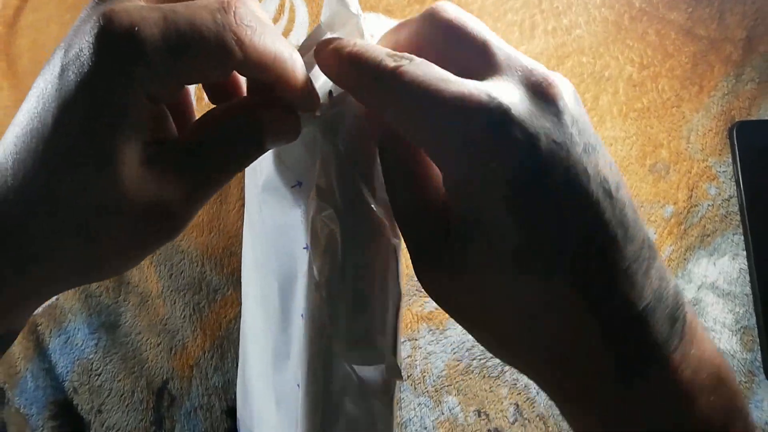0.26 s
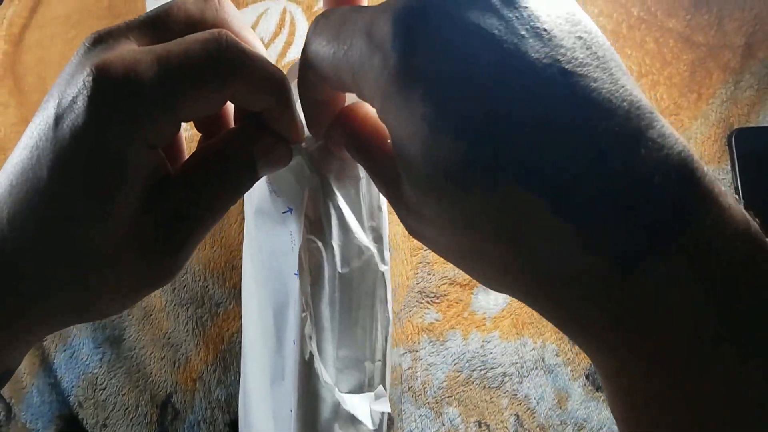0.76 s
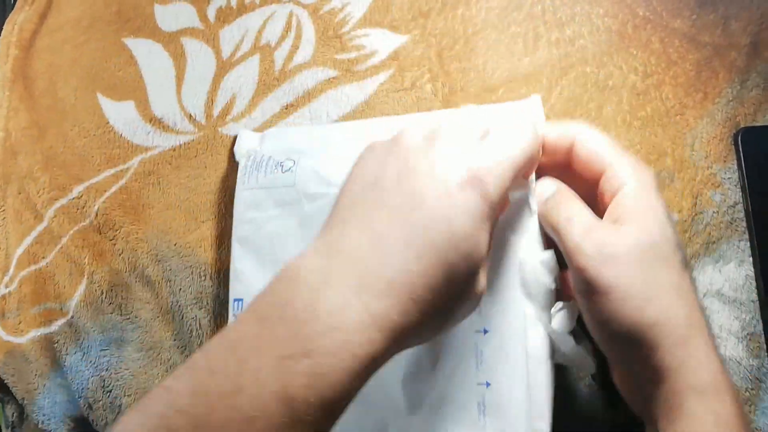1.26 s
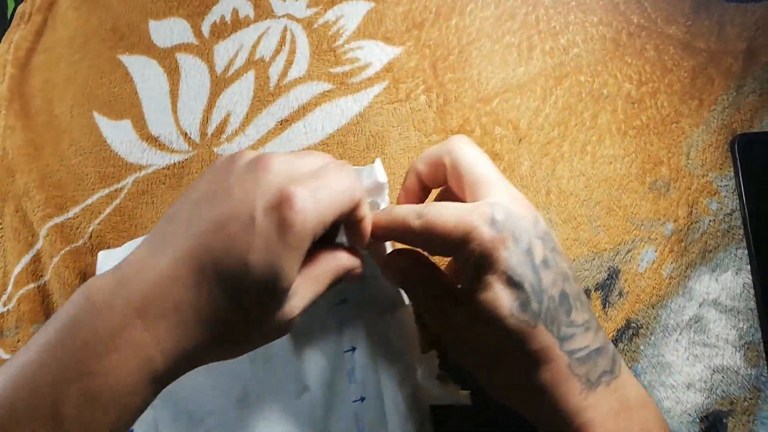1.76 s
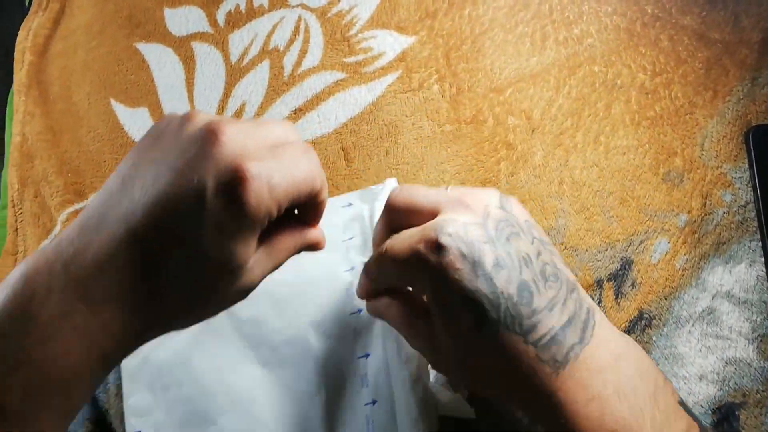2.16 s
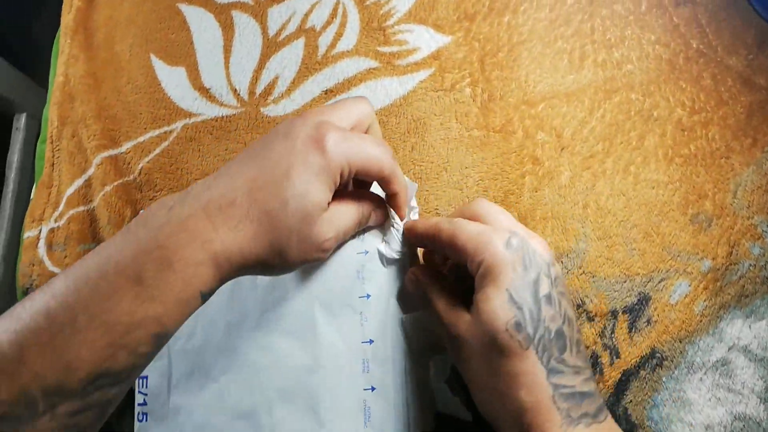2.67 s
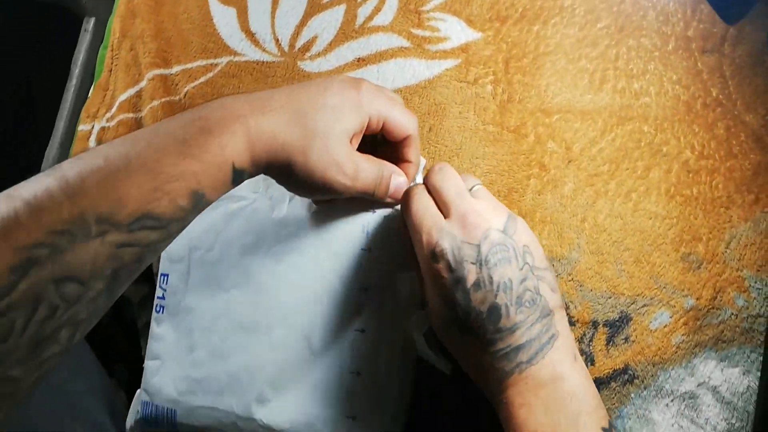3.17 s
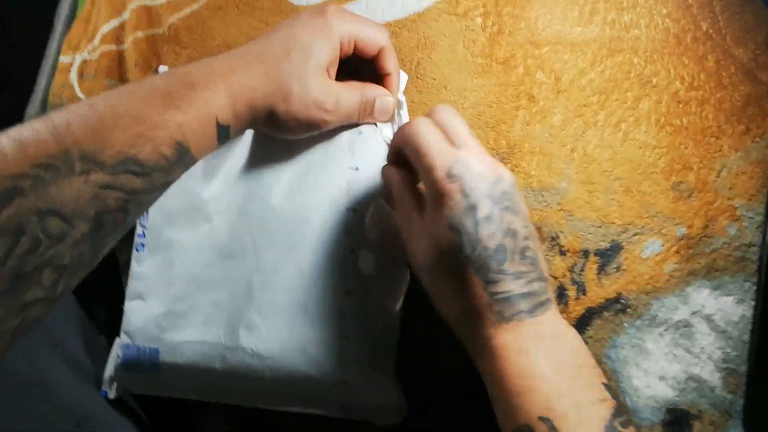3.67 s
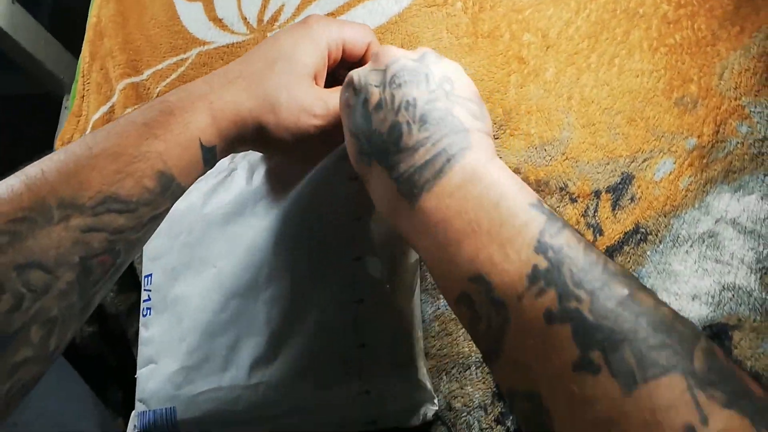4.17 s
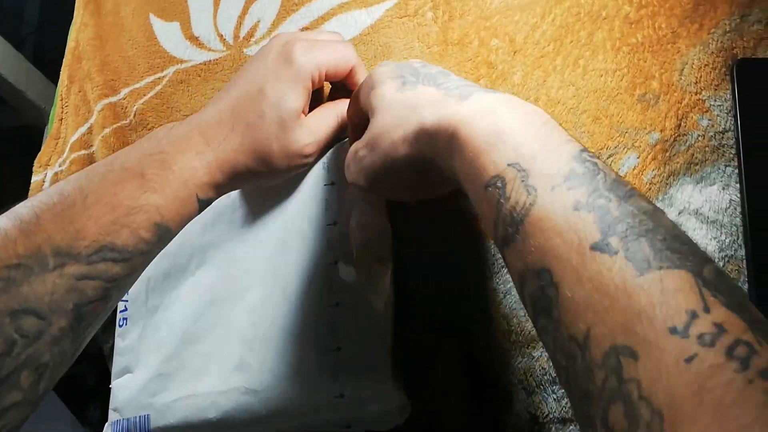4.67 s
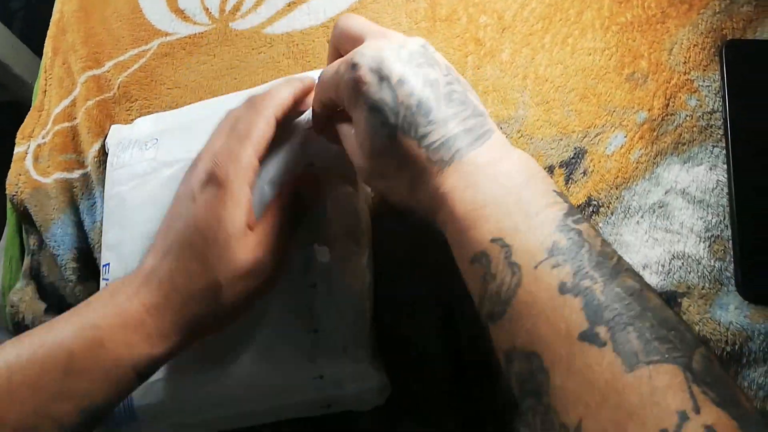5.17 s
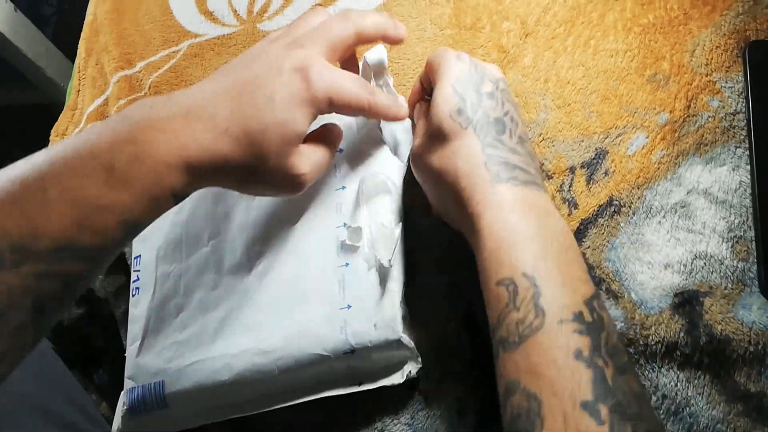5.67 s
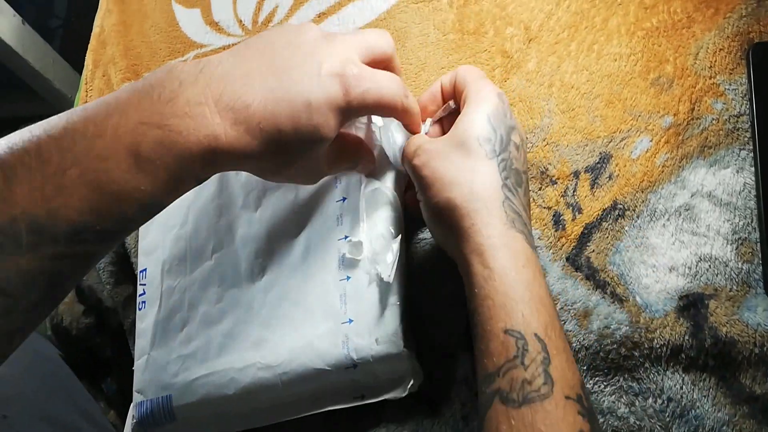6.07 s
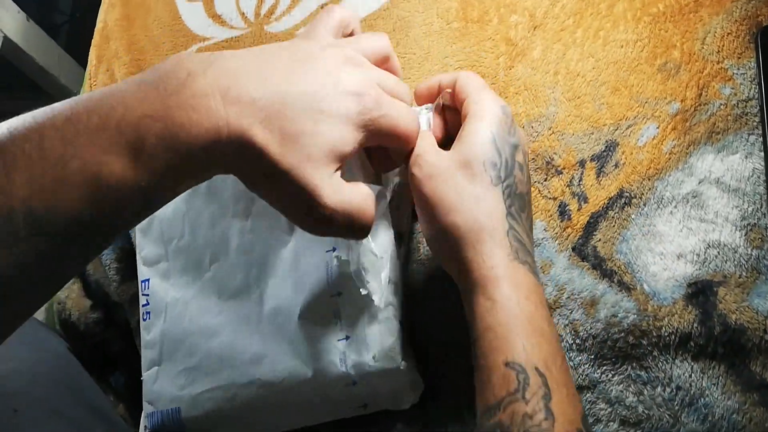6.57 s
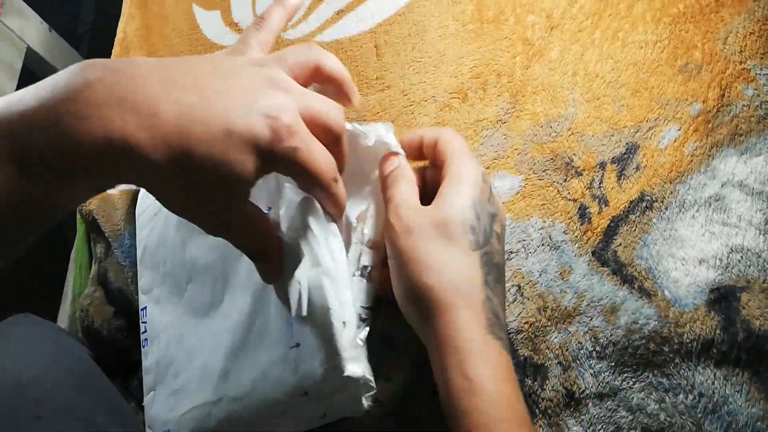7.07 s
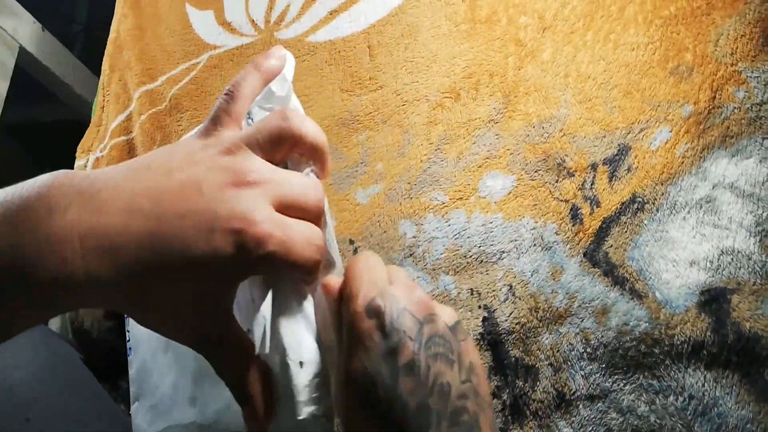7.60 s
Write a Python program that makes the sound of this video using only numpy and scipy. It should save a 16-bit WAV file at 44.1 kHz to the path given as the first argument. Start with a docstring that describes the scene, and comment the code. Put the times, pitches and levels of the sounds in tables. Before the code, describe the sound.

Close, uneven crackling and short crunches as a bubble-lined paper envelope is gripped, tugged and ripped in a quiet room.

```python
"""A quiet, humming room; a two-port microphone close to a blanket, where two hands crumple and tear
a bubble-lined paper envelope. Creases buckle as snaps: swarms of small ones under the grip, single
loud ones on top. Folds give way in short crunches and the seam rips. The air cushion pops near
1.4 kHz, the packet thumps the blanket, and the taut plastic film pings and squeaks."""
import sys
import numpy as np
from scipy import signal
from scipy.fft import rfft, irfft
from scipy.io import wavfile
from scipy.ndimage import uniform_filter1d

SR = 44100
rng = np.random.default_rng(int(sys.argv[2]) if len(sys.argv) > 2 else 0)


def master(y):
    """Save y as 16-bit WAV."""
    cut = np.clip(np.atleast_2d(y).T, -1, 1)
    pcm = np.round(cut * 32767)  # scale
    wavfile.write(sys.argv[1], SR, pcm.astype(np.int16))


N = 345744

# edges between seven bands (thump, knock, cushion, paper, creases, treble, air): f/Hz
BAND_EDGES_HZ = [400, 850, 2200, 4000, 6500, 11000]
# decay of a crease in each band: t60/s
BAND_T60 = [0.038, 0.011, 0.018, 0.011, 0.018, 0.0089, 0.005]
# loud creases: t/s, level/dB, cushion re level/dB, treble re level/dB
LOUD_SNAPS = [(0.375, -17.5, -33, -8), (0.389, -8.5, -28, -2.5), (0.684, -37.5, -25, 22),
              (0.698, -37.5, -31, 24.5), (0.844, -31.5, -6, 6.5), (0.909, -46.5, -31, 24),
              (0.971, -15.5, -12, 7), (1.073, -26.5, -19, 1), (1.217, -12, -9, -14), (1.409, -13, -3, -27),
              (1.619, -4, -19.5, -11), (1.708, -18.5, -30, 6), (1.887, -16.5, -8.5, -14),
              (2.141, -28.5, -15, 6), (2.271, -5, -21, -11), (2.7366, -28.5, -8.5, 12.5),
              (3.094, -23, -11, -3), (3.221, -18.5, 1.5, -22), (3.462, -19, -17, 1.5), (3.533, -14, -9, -3),
              (3.591, -12.5, -0.5, 0.5), (3.658, -9.5, -5.5, -21), (3.669, -27, -18, 13),
              (3.692, -16.5, -28, 2), (3.786, -15, -12.5, -21), (4.007, -23.5, -2, -34),
              (4.103, -28, -16, 2), (4.141, -6.5, -12, -35), (4.211, -22, -2, -39),
              (4.344, -13.5, -12, -54), (4.368, -14, -8, -30), (4.4, -12.5, -6.5, -19),
              (4.54, -11, -13.5, 0.5), (4.633, -17, -29, 6.5), (4.662, -19.5, -2.5, -39),
              (4.769, -6, -12, -28), (4.854, -13.5, -3.5, -1.5), (4.913, -26, 6.5, 7.5),
              (5.117, -26, -13, 10.5), (5.21, -8.5, -22, -5.5), (5.247, -5.5, -10.5, -9),
              (5.257, -12, -11.5, -5), (5.326, -3, -16.5, -52), (5.34, -15, -10, 0.5),
              (5.501, -17, -8.5, -9), (5.836, -25, -32, 1), (6.054, -13, -11, -2), (6.471, -7.5, -10, -11),
              (6.698, -2, -20, -9), (6.726, -10, -30, -5), (6.818, -7.5, -41, -2.5),
              (6.868, -7.5, -5.5, -15), (6.912, -10.5, -36, -3.5), (7.115, -18, -12, 0.5),
              (7.162, -11.5, -14, -11), (7.285, -9.5, -19, -9), (7.378, -8, -29, -33),
              (7.388, -8.5, -46, -4), (7.4, -25.5, -27, 13), (7.601, -13, -10.5, -30), (7.72, -17, 4, 14),
              (7.739, -22, -21, 0)]
# packet tugged against the blanket: t/s, level/dB
TUGS = [(2.203, -32), (2.25, -32.5), (2.319, -29), (2.381, -32.5), (3.587, -25), (5.543, -39), (6.345, -28),
        (7.749, -29.5)]


def amp(db):
    return 10 ** (np.asarray(db) / 20)


def unit_rms(x):
    return x / np.sqrt(np.mean(x ** 2) + 1e-20)


def curve_at(points, hz, column=1):
    """One column of a table, interpolated over log frequency."""
    table = np.transpose(points)
    return np.interp(np.log(hz + 1), np.log(table[0] + 1), table[column])


def decay(power, t60):
    """Every spike of power starts a decay of that height."""
    return signal.lfilter([1], [1, -amp(-120 / (t60 * SR))], power)


def smooth(x, samples):
    return uniform_filter1d(uniform_filter1d(x, samples), samples)


def held_db(start, length, rise_db_per_s, fall_db_per_s):
    """Attack, hold, release in dB re the held level, every millisecond."""
    t = np.arange(0, N / SR, 1e-3)
    return -rise_db_per_s * np.maximum(start - t, 0) - fall_db_per_s * np.maximum(t - start - length, 0)


def per_sample(curve):
    return np.interp(np.arange(N), np.linspace(0, N, len(curve)), curve)


def hollow_tones(times, levels_db, hz, octaves, t60, rise_s):
    """One dying tone for each blow, each at its own pitch around hz."""
    out, t = np.zeros(N), np.arange(4000) / SR
    pitches = hz * 2 ** (octaves * rng.uniform(-1.23, 1, len(times)))
    for start, db, pitch in zip(times, levels_db, pitches):
        tone = amp(db - 60 * t / t60) * np.minimum(t / rise_s, 1) * np.sin(2 * np.pi * pitch * t)
        span = out[round(start * SR):][:len(t)]
        span += tone[:len(span)]
    return out


def room_hum(level_db=-55):
    """Steady room tone and microphone noise on both paths."""
    spectrum = [(30, 1.5), (1460, -14), (16000, -21.5)]  # f/Hz, level/dB
    colour = amp(curve_at(spectrum, np.fft.rfftfreq(N, 1 / SR)))
    return amp(level_db) * unit_rms(irfft(rfft(rng.standard_normal((2, N))) * colour, N))


def blanket_rumble(t60=0.22, tail_db=-6.5):
    """Power of the low rumble after each tug."""
    times, db = np.transpose(TUGS)
    spikes = np.zeros(N)
    spikes[(times * SR).astype(int)] = amp(db + tail_db) ** 2
    return abs(uniform_filter1d(decay(spikes, t60), size=600))


def blanket_thumps():
    """The blanket answers each tug with a dull push."""
    return hollow_tones(*np.transpose(TUGS), hz=172.7, octaves=0.57, t60=0.061, rise_s=0.0027)


def plastic_film(roughness=0.31, rise_s=0.0022):
    """Taut film lets go with a ping or squeaks under a finger, ringing roughly in its modes."""
    # film lets go: t/s, level/dB
    pings = [(3.405, -13.5), (3.5055, -7)]
    # film slips: t/s, level/dB
    squeaks = [(3.405, -34), (3.4208, -40), (3.4364, -33), (3.4715, -31), (3.5659, -37)]
    # two ping modes, then three squeak modes: f/Hz, level/dB, t60/s
    film_modes = [(7260, -1.5, 0.036), (7730, -6, 0.028), (3200, 8, 0.043), (4300, 3, 0.044),
                  (5200, -1, 0.057)]
    out, t = np.zeros(N), np.arange(6000) / SR
    for blows, modes in ((pings, film_modes[:2]), (squeaks, film_modes[2:])):
        for start, blow_db in blows:
            ring = sum(amp(blow_db + db - 60 * t / t60) * np.sin(2 * np.pi * hz * t)
                       for hz, db, t60 in modes)
            stutter = 1 + roughness * unit_rms(uniform_filter1d(rng.standard_normal(len(t)), size=60))
            out[round(start * SR):][:len(t)] += ring * stutter * np.minimum(t / rise_s, 1)
    return out


def cushion_pops():
    """The air cushion answers each loud snap with a hollow pop."""
    times, snap_db, cushion_db, _ = np.transpose(LOUD_SNAPS)
    return hollow_tones(times, snap_db + cushion_db + 1.5, hz=1399, octaves=0.41, t60=0.021, rise_s=49e-5)


def facet_rings(power, struck, level_db=-4.0, t60_ratio=0.39, pitch_count=5):
    """Each crease strikes its own small facet: a dying tone in each of four bands, cushion to treble."""
    out, pick = np.zeros(N), rng.integers(0, pitch_count, (len(struck), len(BAND_T60)))
    for band in range(2, 6):
        radius = amp(-60 / (t60_ratio * BAND_T60[band] * SR))
        pitches = np.geomspace(1.15 * BAND_EDGES_HZ[band - 1], 0.823 * BAND_EDGES_HZ[band], pitch_count)
        for j, hz in enumerate(pitches):
            blows, hits = np.zeros(N), struck[pick[:, band] == j]
            blows[hits] = np.sqrt(2 * abs(power[band, hits]))
            poles = [1, -2 * radius * np.cos(2 * np.pi * hz / SR), radius ** 2]
            out += signal.lfilter([.5, 0, -.5], poles, blows)
    return amp(level_db) * np.array([out, np.roll(out, shift=31)])  # the other path is 24 cm longer


def packet_noise(power, band):
    """Noise on both paths that follows one band's power, in the packet's colour."""
    # the packet as the microphone colours it: f/Hz, level/dB
    spectrum = [(24, -74), (40, -11.5), (199, -1), (312, -5.5), (479, -15.5), (1070, -9.5), (1520, -6.5),
                (2210, -8.5), (3060, 0), (6490, -3), (8990, 0.5), (11600, -10), (16000, -29.5)]
    hz, edges = np.fft.rfftfreq(4096, 1 / SR) + 1, [1e-3] + BAND_EDGES_HZ + [1e9]
    skirts = np.sqrt((1 + (edges[band] / hz) ** 12) * (1 + (hz / edges[band + 1]) ** 12))
    gain = amp(curve_at(spectrum, hz)) / skirts
    log_gain = np.log(np.r_[gain, gain[-2:0:-1]] + 1e-5)
    taps = np.fft.ifft(np.exp(np.conj(signal.hilbert(log_gain)))).real[:2048]  # minimum phase
    taps /= np.linalg.norm(taps)
    jolts = rng.standard_normal((2, N)) * np.sqrt(abs(power))
    return signal.oaconvolve(jolts, taps[None], axes=1)[:, :N]


def handling(rest_db=-61, rest_cushion_db=-63):
    """Paper, cushion and treble lift in dB: rest, grips and crunches add; the top grip sets the lift."""
    # hands work the packet: t/s, length/s, rustle/dB, cushion re rustle/dB, treble lift/dB
    grips = [(0.0, 0.0046, -33.5, -6.5, -3), (0.13, 0.71, -47, -6.5, 1), (0.948, 0.49, -37, -6, 0),
             (1.531, 0.4, -39, -9, -0.5), (2.162, 0.25, -31, -4, -2.5), (2.666, 1, -43.5, -2.5, -0.5),
             (3.181, 0.6, -35.5, -7.5, -1.5), (3.867, 0.38, -44, -7, -2.5), (4.355, 0.15, -37.5, -0.5, -4),
             (4.548, 0.19, -31, -8, -1.5), (4.991, 0.45, -36.5, -3, -0.5), (5.491, 0.19, -32.5, -2, 0.5),
             (5.815, 0.29, -35, -10, 1.5), (6.177, 0.38, -28, -7.5, 1.5), (6.63, 0.51, -30.5, -7.5, 0.5),
             (7.157, 0.4, -35.5, -6, 2), (7.614, 0.2, -31.5, -4.5, 3.5)]
    # a fold gives way: middle t/s, length/s, rustle/dB, cushion re rustle/dB
    crunches = [(0.72, 0.083, -39.5, -6.5), (0.964, 0.0051, -28, -16), (1.43, 0.04, -31.5, 4.5),
                (1.589, 0.079, -30.5, 0.9), (2.327, 0.0047, -24, -0.5), (3.293, 0.068, -24, -3.5),
                (3.643, 0.13, -29.5, -5.5), (4.143, 0.025, -34.5, 0.5), (4.653, 0.022, -22, -5.5),
                (4.858, 0.13, -30.5, -5), (5.228, 0.08, -29, -1.5), (5.375, 0.077, -27.5, -8),
                (5.559, 0.014, -20, -3), (5.952, 0.044, -27.5, -10), (6.21, 0.023, -22, -7),
                (6.369, 0.032, -19.5, -6.5), (6.693, 0.034, -26, -10.5), (6.875, 0.0068, -20, -7),
                (6.992, 0.094, -23.5, -12.5), (7.5, 0.047, -30, -6), (7.697, 0.022, -19.5, -4.5)]
    grips_db = [held_db(start, length, rise_db_per_s=601, fall_db_per_s=177) + db
                for start, length, db, *_ in grips]
    folds_db = [held_db(middle - length / 2, length, rise_db_per_s=446, fall_db_per_s=417) + db
                for middle, length, db, _ in crunches]
    power = amp(grips_db + folds_db) ** 2
    cushion_share = amp([row[3] for row in grips + crunches]) ** 2
    paper_db = 10 * np.log10(amp(rest_db) ** 2 + power.sum(axis=0))
    cushion_db = 10 * np.log10(amp(rest_cushion_db) ** 2 + cushion_share @ power)
    lift_db = np.array([row[4] for row in grips])[np.argmax(grips_db, axis=0)]
    return per_sample(paper_db), per_sample(cushion_db), per_sample(lift_db)


def seam_rip(start=6.17, length=0.126, lift_db=4.9):
    """The seam rips with a rasp: dB by which the paper band rises and the crease band drops."""
    envelope_db = held_db(start, length, rise_db_per_s=446, fall_db_per_s=177)
    return per_sample(np.maximum(envelope_db + lift_db, 0))


def small_creases(at, spread_db=4.5, colour_db=4.5, sliding_db=-1.5):
    """Band powers of small creases buckling in spurts, over the hiss of fingers sliding on paper."""
    paper_db, cushion_db, lift_db = handling()
    rip_db = seam_rip()
    thump_db = 0.65 * (cushion_db + 34.5)  # the blanket answers the squeezed cushion
    air_db = paper_db + 0.16 * (paper_db + 43.5)  # a harder pull sounds brighter
    bands_db = [thump_db - 52, cushion_db - 15, cushion_db - 3.8, paper_db + rip_db - 10.1,
                paper_db - rip_db - 11, paper_db + lift_db - 5.5, air_db + 2 * lift_db - 14]
    size_db = spread_db * np.minimum(rng.exponential(1, N)[at], 2.6)
    size_db *= np.clip(1 - (paper_db[at] + 41) / 45, .3, 1)  # a hard pull evens the creases into a rasp
    timbre_db = colour_db * np.clip(rng.standard_normal((len(at), len(BAND_T60))).T, -3, 1.8)
    spurts = unit_rms(smooth(rng.standard_normal((2, N)), samples=900))
    spurts_db = 3.2 * np.clip(spurts, -3, 1.5)  # cushion and paper move in separate spurts of 20-40 ms
    power = np.zeros((len(BAND_T60), N))
    power[:, at] = amp(size_db + timbre_db) ** 2
    for band, db in enumerate(bands_db):
        grains = decay(power[band], BAND_T60[band])
        grains /= abs(smooth(grains, int(0.11 * SR))) + 1e-9  # the grip sets the energy, chance its grain
        power[band] = (grains + amp(sliding_db) ** 2) * amp(db + spurts_db[int(band > 2)]) ** 2
    return power


def loud_snaps(paper_db=-9.5, gain_db=2.0, colour_db=1.5, rustle_db=-17):
    """Band powers of single big creases buckling, each with a short rustle after it."""
    times, snap_db, cushion_db, treble_db = np.transpose(LOUD_SNAPS)
    bands_db = [cushion_db - 22, cushion_db - 16.5, cushion_db - 2.5, np.full(len(times), paper_db),
                (paper_db + treble_db) / 2 - 5, treble_db, treble_db - 6]
    timbre_db = colour_db * rng.standard_normal((len(times), len(BAND_T60))).T
    spikes = np.zeros((len(BAND_T60), N))
    spikes[:, (times * SR).astype(int)] = amp(snap_db + gain_db + timbre_db + bands_db) ** 2
    spikes = abs(uniform_filter1d(spikes, size=26))  # rounds off the attack of each loud snap
    crack = np.array([decay(row, 0.77 * t60) for row, t60 in zip(spikes, BAND_T60)])
    return crack + amp(rustle_db) ** 2 * decay(spikes, t60=.05)


def microphone_ports(shared, other):
    """The right port hears the left's sound shifted in phase, blended with sound from other paths."""
    # port against port: f/Hz, likeness/0-1, left re right/dB, left leads/rad
    ports = [(104, 1, 0.5, 0.22), (300, 0.78, -1.3, 0.078), (400, 0.83, 1.5, 2.19),
             (1333, 0.99, -0.5, 0.69), (1610, 0.43, -12.5, 1.15), (2354, 0.31, 4.5, 2.25),
             (5900, 0.81, 0.5, 1.18), (9500, 0.03, 7, 2.44), (11300, 0.1, -3, 8.3)]
    hz = np.fft.rfftfreq(N, 1 / SR)
    likeness = curve_at(ports, hz, column=1)
    lean = amp(curve_at(ports, hz, column=2) / 2)
    lag = np.exp(-1j * curve_at(ports, hz, column=3))
    left = rfft(shared)
    right = likeness * lag * left + np.sqrt(1 - likeness ** 2) * rfft(other)
    return irfft(np.array([left * lean, right / lean]), N)


def scene():
    """Envelope, blanket and room reach the close microphone along two paths."""
    creases_per_s = 260
    creases = np.flatnonzero(rng.random(N) < creases_per_s / SR)
    power = small_creases(creases) + loud_snaps()
    struck = np.union1d(creases, (np.transpose(LOUD_SNAPS)[0] * SR).astype(int))
    paths = room_hum() + plastic_film() + cushion_pops() + blanket_thumps() + facet_rings(power, struck)
    power = uniform_filter1d(power, size=12)  # softens the onset of each click slightly
    power[0] += blanket_rumble()
    for band, band_power in enumerate(power):
        paths += packet_noise(band_power, band)
    lean_db = 0.87 * np.clip(1.1 - np.arange(N) / SR, 0, 1)  # the packet is first held up to the left
    return microphone_ports(*paths) * amp(np.array([lean_db, -lean_db]) / 2)


def record(dry):
    """The recorder clips at full scale, then cuts the top above 15.9 kHz."""
    taps = signal.firwin(511, 15900, window=("kaiser", 9), fs=SR)
    return signal.oaconvolve(np.clip(dry, -1, 1), taps[None], "same")


dry = scene()
out = record(dry)
master(out)
```